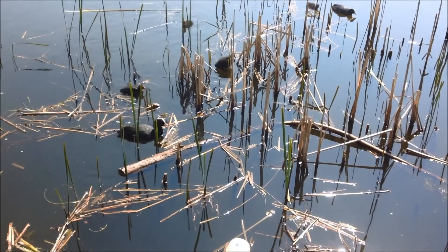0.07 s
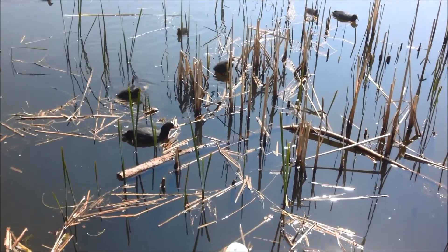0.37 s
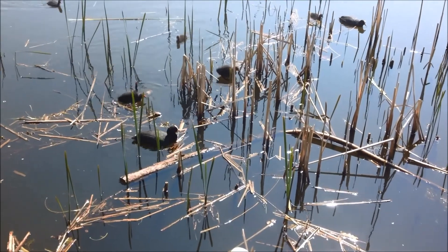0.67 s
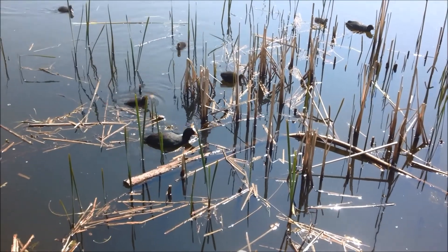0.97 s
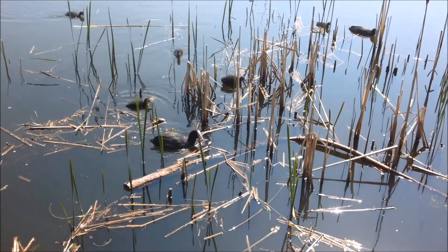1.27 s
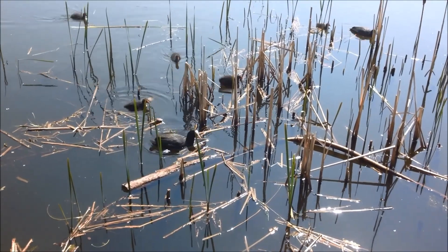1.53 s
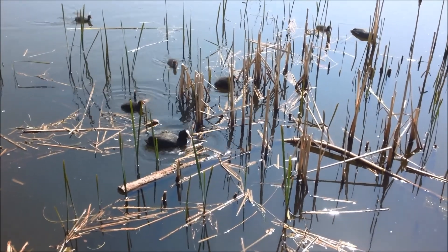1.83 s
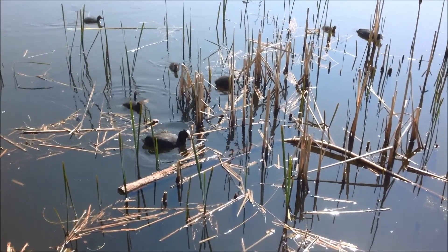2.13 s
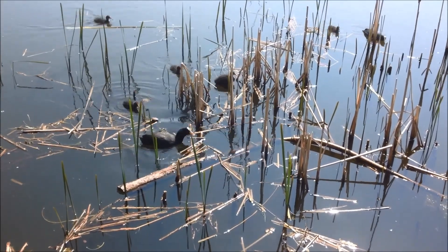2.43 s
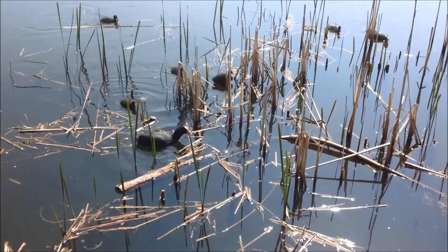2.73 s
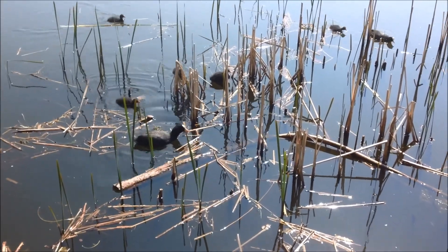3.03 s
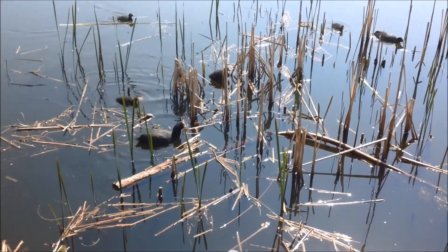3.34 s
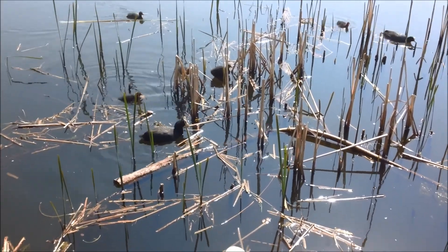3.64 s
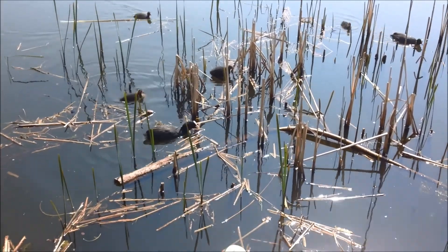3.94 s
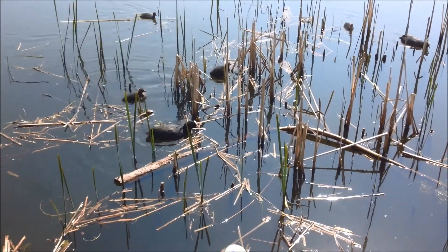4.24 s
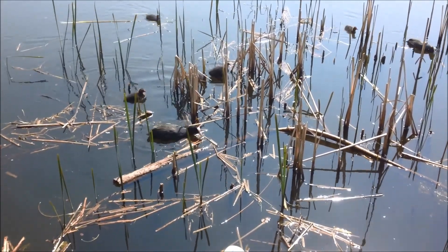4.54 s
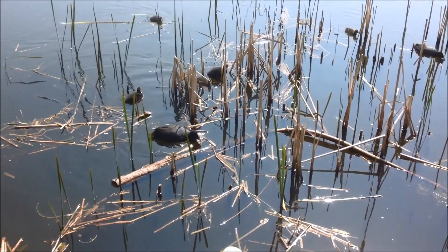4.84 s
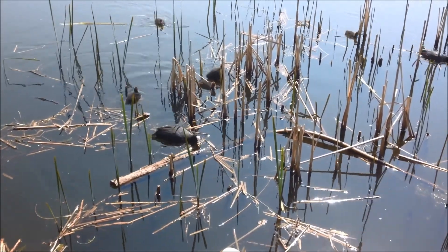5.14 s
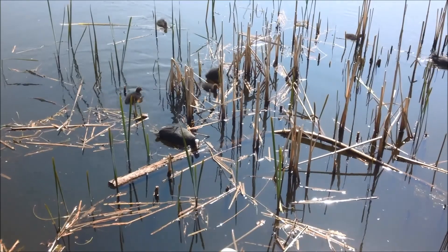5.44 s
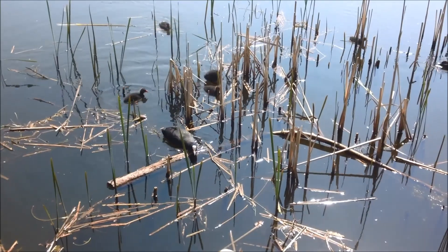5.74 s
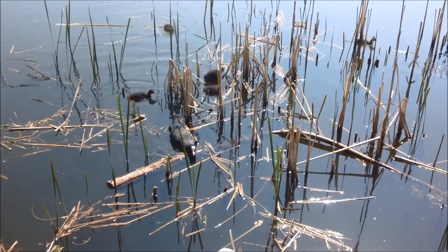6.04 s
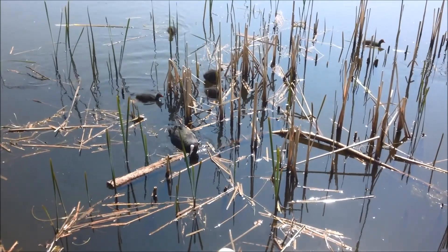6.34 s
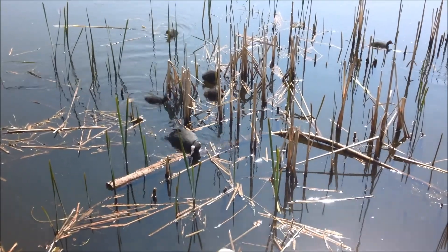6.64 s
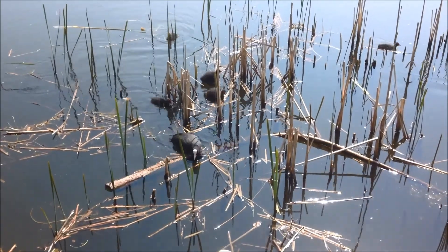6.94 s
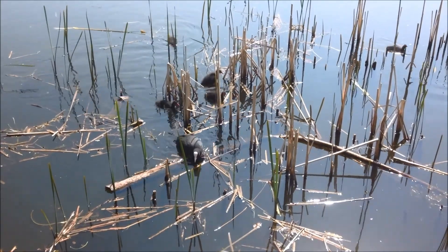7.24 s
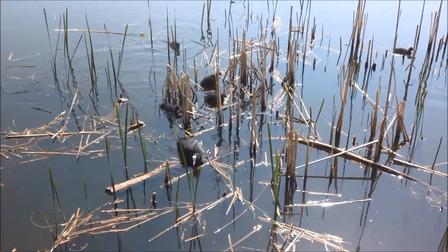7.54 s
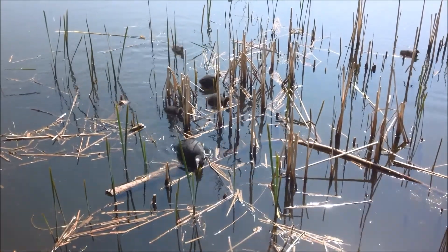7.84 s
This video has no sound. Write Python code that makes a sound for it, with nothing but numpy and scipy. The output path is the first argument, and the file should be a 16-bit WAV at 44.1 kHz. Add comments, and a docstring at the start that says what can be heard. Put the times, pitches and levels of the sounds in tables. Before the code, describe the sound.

A coot calls close to the microphone on a quiet canal, and is by far the loudest sound. It gives four short, harsh, stuttering honks at about 0.3, 1.1, 2.2 and 4 seconds, the first one softer. Three sharp, high, cracking squeaks come at 1.3, 2.5 and 4 seconds, the last running into the final honk. The banks return a faint echo. Farther off, chicks peep softly throughout, adding falling, begging whistles until about 5.3 seconds. Distant songbirds whistle and warble faintly, briefly around 3 seconds and more steadily from 5.5 seconds to the end near 8. Dry reeds rustle and tick lightly during the first five seconds. Gentle puffs of wind brush the microphone, and a camera's focus motor gives tiny, very high whines, mainly in the first second and around 5 seconds. A faint distant drone and airy hiss lie underneath.

```python
"""Coot and chicks on a canal

A coot gives four stuttering "kow" calls and three sharp "pix" notes with its syrinx, a bird's voice box.
Its chicks peep and beg in gliding whistles, and far birds warble. Dry reeds rub and snap, light wind
brushes the microphone, and a camera's focus motor whines now and then. A distant drone and an airy
hiss lie underneath, and the banks return a faint echo of the birds."""
import sys
import numpy as np
from scipy import signal
from scipy.fft import rfft, irfft, next_fast_len
from scipy.io import wavfile

SR = 44100
rng = np.random.default_rng(int(sys.argv[2]) if len(sys.argv) > 2 else 0)


def file_out(sig):
    """Save sig as 16-bit WAV at sys.argv[1]."""
    # one column per channel
    cols = np.atleast_2d(sig).T
    # limit, then scale
    lim = np.clip(cols, -1, 1)
    pcm = np.round(lim * 32767).astype(np.int16)
    wavfile.write(sys.argv[1], SR, pcm)


N = 348390
TIME = np.arange(N) / SR


def from_db(db):
    """Turn decibels into a number to multiply by."""
    return 10 ** (np.asarray(db) / 20)


def gain_at(colour, hz):
    """How strongly a table of (frequency [Hz], level [dB]) passes the given frequencies."""
    table_hz, db = np.transpose(colour)
    return from_db(np.interp(np.log(np.maximum(hz, 1)), np.log(table_hz), db))


def noise(colour):
    """Noise of average power 1; the colour table sets its mix of low and high frequencies."""
    size = next_fast_len(N)
    spectrum = rfft(rng.standard_normal(size)) * gain_at(colour, np.fft.rfftfreq(size, 1 / SR))
    sound = irfft(spectrum, size)[:N]
    return sound / np.sqrt(np.mean(sound ** 2) + 1e-20)


def drift(t, rate):
    """A random wobble that heads for a new value `rate` times a second."""
    return np.interp(t * rate, np.arange(1024), rng.standard_normal(1024))


def clock(length):
    """The time of each sample in one event, in seconds."""
    return np.arange(max(int(length * SR), 2)) / SR


def add(out, start, sound):
    """Mix a sound in at `start` seconds."""
    at = int(round(start * SR))
    sound, at = sound[max(-at, 0):], max(at, 0)
    out[at:at + len(sound)] += sound[:max(N - at, 0)]


def phase_of(hz):
    """The angle a vibration has turned through as its pitch changes."""
    return 2 * np.pi * np.cumsum(hz) / SR


def fade_ends(t, edge):
    """Fade in and out, each over `edge` seconds."""
    return np.sin(np.pi / 2 * np.clip(np.minimum(t, t[-1] - t) / edge, 0, 1))


def hump(t, centre, half):
    """A bell-shaped swell of height 1."""
    return np.exp(-np.minimum(((t - centre) / half) ** 2, 30))


def whistle(t, hz, harmonics_db=(0,), jitter=.009, flutter_db=4):
    """A nearly pure tone with unsteady pitch (jitter) and strength (flutter)."""
    phase = phase_of(hz * (1 + jitter * drift(t, 488)))
    flutter = from_db(flutter_db * drift(t, 158))
    return flutter * sum(from_db(db) * np.sin(k * phase) for k, db in enumerate(harmonics_db, 1))


# puffs of wind: (peak time [s], half length [s], level [dB])
WIND_PUFFS = [(0.084, 0.058, -54), (0.275, 0.086, -48.5), (0.445, 0.025, -48.5), (0.57, 0.091, -54),
              (0.817, 0.082, -46), (0.943, 0.037, -46.5), (1.07, 0.06, -55.5), (1.693, 0.055, -45.5),
              (1.801, 0.013, -50.5), (1.942, 0.029, -41.5), (3.084, 0.038, -46.5), (3.183, 0.029, -42),
              (3.292, 0.05, -43.5), (3.45, 0.2, -57.5), (4.08, 0.11, -59), (5.257, 0.021, -52),
              (7.258, 0.013, -41), (7.43, 0.034, -48), (7.66, 0.14, -59), (7.763, 0.012, -48.5),
              (7.865, 0.021, -42.5)]
# the wind's low rumble: (frequency [Hz], level [dB])
WIND_COLOUR = [(20, -25), (50, -20.5), (90, -3.5), (150, 2.5), (210, -2), (300, -11), (500, -23.5),
               (1200, -74)]
def wind(breeze_db=-64.5, swing_db=1.5, swings_per_s=13):
    """Light air brushes the microphone, with stronger puffs now and then."""
    breeze = from_db(breeze_db + swing_db * drift(TIME, swings_per_s))
    puffs = sum(from_db(db) * hump(TIME, peak, half) for peak, half, db in WIND_PUFFS)
    return np.hypot(breeze, puffs) * noise(WIND_COLOUR)


# how the drone and the hiss rise and fall: (time [s], level [dB])
DRONE_LEVELS = [(0.0, -67.5), (0.72, -57), (1.65, -53.5), (2.11, -60.5), (2.86, -63), (3.19, -60.5),
                (4.82, -60.5), (5.19, -57), (6.07, -56), (6.18, -59.5), (7.0, -59.5), (7.26, -58.5),
                (7.9, -60)]
HISS_LEVELS = [(0.0, -56.5), (0.55, -56.5), (1.12, -54), (1.32, -50.5), (1.52, -66.5), (1.67, -61.5),
               (1.96, -59.5), (2.62, -60.5), (3.37, -54.5), (3.63, -60), (5.76, -59), (6.2, -61),
               (6.53, -57.5), (7.0, -60.5), (7.41, -59), (7.9, -58)]
# the tone of the drone, the hiss and the still air: (frequency [Hz], level [dB])
DRONE_COLOUR = [(60, -38), (180, -6.5), (255, 1.5), (288, 6.5), (325, -1), (400, -1.5), (600, -17),
                (1000, -33.5)]
HISS_COLOUR = [(1200, 1.5), (2000, 1), (2800, 5), (4300, 0.5), (5500, -3.5), (8000, -9), (10000, -21),
               (13000, -20), (15500, -13.5)]
AIR_COLOUR, AIR_DB = [(100, -5.5), (500, 2.5), (800, 2.5), (1200, -2.5), (1800, -7), (3000, -9.5),
                      (6000, -61)], -62
def background(hiss_gain_db=-3.5):
    """A distant drone and an airy hiss slowly swell and sink over a steady hush."""
    drone = from_db(np.interp(TIME, *np.transpose(DRONE_LEVELS))) * noise(DRONE_COLOUR)
    hiss = from_db(np.interp(TIME, *np.transpose(HISS_LEVELS)) + hiss_gain_db) * noise(HISS_COLOUR)
    return drone + hiss + from_db(AIR_DB) * noise(AIR_COLOUR)


# the chicks' begging whistles: (time [s], held pitch [Hz], length [s], level [dB])
BEGGING_WHISTLES = [(.007, 2900, 0.118, -52.5), (0.338, 2690, 0.16, -56), (0.696, 3750, 0.13, -55),
                    (1.076, 4400, 0.07, -45), (1.434, 4400, 0.072, -50), (1.775, 3300, 0.095, -55),
                    (2.491, 2850, 0.12, -52), (2.889, 4280, 0.093, -54.5), (3.209, 3100, 0.15, -57),
                    (3.582, 4350, 0.072, -54), (4.298, 4370, 0.078, -55), (4.618, 3850, 0.082, -51.5),
                    (4.946, 3810, 0.055, -60), (5.01, 3750, 0.096, -55.5), (5.234, 4140, 0.078, -55)]
def chick_begging(start_hz=6900, gain_db=-0.5, fade_db=-1.0):
    """Each whistle drops from high up, then holds its pitch."""
    out = np.zeros(N)
    for start, held_hz, length, db in BEGGING_WHISTLES:
        t = clock(length)
        drop_s = 0.019 * (4000 / held_hz) ** 2.9   # a deeper drop takes longer
        hz = held_hz + (start_hz - held_hz) * np.exp(-(t / drop_s) ** 2)
        loudness = from_db(db + gain_db + fade_db * t / length) * fade_ends(t, 0.0045)
        add(out, start, loudness * whistle(t, hz, harmonics_db=(0, -24)))
    return out


def chick_chatter(peeps_per_s=3.0, pitch_range_hz=(3290, 5200)):
    """Extra soft peeps at random moments, as rows like those of PEEPS."""
    draws = rng.random((int(peeps_per_s * N / SR), 4))
    return [(when * N / SR, np.interp(high, (0, 1), pitch_range_hz), .018 + .012 * long, -73 + 6 * loud)
            for when, high, long, loud in draws]


# the chicks' peeps: (peak time [s], top pitch [Hz], half length [s], level [dB])
PEEPS = [(0.088, 3670, 0.025, -60), (0.155, 5400, 0.036, -60), (0.238, 3440, 0.025, -58),
         (0.814, 5850, 0.036, -58.5), (1.706, 6600, 0.028, -63), (1.908, 5730, 0.038, -56.5),
         (2.061, 6040, 0.026, -50), (2.637, 3820, 0.023, -58), (2.808, 6720, 0.023, -60.5),
         (2.91, 5650, 0.041, -57.5), (3.075, 6100, 0.033, -55), (3.258, 5500, 0.028, -52),
         (3.427, 5930, 0.033, -50.5), (3.652, 6800, 0.025, -62), (3.946, 7050, 0.04, -57),
         (4.088, 5210, 0.049, -60), (4.463, 5900, 0.041, -59.5), (4.63, 6270, 0.032, -53.5),
         (4.745, 3650, 0.023, -60.5), (5.014, 5900, 0.043, -56), (5.187, 6040, 0.032, -61.5),
         (5.282, 5660, 0.041, -57), (5.443, 4170, 0.026, -58.5), (5.595, 3800, 0.018, -58),
         (5.669, 5850, 0.041, -59.5), (5.757, 3840, 0.02, -58), (5.842, 5600, 0.034, -63),
         (5.909, 5880, 0.032, -66), (5.968, 3830, 0.021, -61.5), (6.04, 6200, 0.023, -63.5),
         (6.2, 6430, 0.037, -58.5), (6.331, 5800, 0.033, -61), (6.58, 5200, 0.025, -60.5),
         (6.613, 3880, 0.023, -60.5), (6.704, 6870, 0.041, -59), (6.984, 6580, 0.033, -56.5),
         (7.124, 4770, 0.021, -62.5), (7.255, 5920, 0.025, -59), (7.383, 5880, 0.044, -57),
         (7.484, 3830, 0.022, -58.5), (7.62, 6080, 0.036, -57.5)]
def chick_peeps(rest_hz=2540, gain_db=4.5, fade_db=-0.5, lean=0.25, hoarse_after_s=0.026):
    """Each peep climbs from a low resting pitch to its top and sinks back, in a slightly leaning arch."""
    out = np.zeros(N)
    for peak, top_hz, half, db in list(PEEPS) + chick_chatter():
        t = clock(4 * half)
        from_top = t / half - 2
        tilt = 1 + lean * rng.uniform(-0.98, 1) * np.tanh(from_top)
        tension = np.exp(-from_top ** 2 * tilt)
        hz = (rest_hz + (top_hz - rest_hz) * tension) * (1 + .016 * drift(t, 71))
        # strained toward the top, a long peep breaks into a hoarse, slightly higher hiss
        broken = np.clip(36 * (half - hoarse_after_s), .1, .85) * tension ** 2
        hoarse_hz = hz * (1 + .13 * (.5 + drift(t, 4000)))
        hoarse = from_db(-1) * whistle(t, hoarse_hz, harmonics_db=(0, -18))
        clear = whistle(t, hz, harmonics_db=(0, -18, -26))
        loudness = from_db(db + gain_db + fade_db * from_top) * np.exp(-(from_top / 1.45) ** 6)
        add(out, peak - 2 * half, loudness * ((1 - broken) * clear + broken * hoarse))
    return out


# notes of far birds: (time [s], length [s], start pitch [Hz], end pitch [Hz], level [dB])
FAR_NOTES = [(0.118, 0.17, 2093, 2003, -60.5), (0.851, 0.14, 2280, 2125, -57),
             (1.951, 0.055, 1950, 2340, -58), (1.997, 0.062, 2350, 2270, -52),
             (3.174, 0.05, 2150, 2430, -54)]
def far_whistles():
    """Birds across the water give soft, low, sliding whistles."""
    out = np.zeros(N)
    for start, length, start_hz, end_hz, db in FAR_NOTES:
        t = clock(length)
        tone = whistle(t, np.linspace(start_hz, end_hz, len(t)), jitter=.018, flutter_db=3)
        add(out, start, from_db(db) * fade_ends(t, 0.0056) * tone)
    return out


# reeds brushing together: (peak time [s], half length [s], level [dB])
RUSTLES = [(0.9, 0.059, -60.5), (1.583, 0.016, -58.5), (1.784, 0.049, -55.5), (2.964, 0.074, -64.5),
           (3.3, 0.065, -62), (3.643, 0.1, -65.5), (3.906, 0.084, -60.5), (4.431, 0.042, -57),
           (4.888, 0.1, -62.5)]
# stems snapping: (time [s], level [dB])
SNAPS = [(0.164, -44.5), (0.28, -49), (0.594, -45), (0.952, -37), (.960, -42), (1.785, -45), (3.287, -48),
         (4.5613, -40.5), (4.906, -47)]
# the crisp tone of dry reeds: (frequency [Hz], level [dB])
REED_COLOUR = [(1500, -1.5), (3000, 0.5), (5000, 3), (7500, 2), (9500, -8), (12000, -8.5), (15500, -13)]
def reeds(grain_db=5.0, snap_decay_s=0.0012):
    """Dry leaves rub in grainy swells, and a stem ticks now and then."""
    swells = sum(from_db(db) * hump(TIME, peak, half) for peak, half, db in RUSTLES)
    grain_times = TIME[::64]
    grain = np.interp(TIME, grain_times, rng.standard_normal(len(grain_times)))
    loudness = swells * from_db(grain_db * grain)
    for start, db in SNAPS:
        add(loudness, start, from_db(db) * np.exp(-clock(.02) / snap_decay_s))
    return loudness * noise(REED_COLOUR)


# runs of the focus motor: (time [s], length [s], level [dB])
FOCUS_RUNS = [(0.205, 0.036, -55.5), (.333, 0.014, -47.5), (.409, 0.015, -46), (.624, 0.015, -45),
              (3.276, .035, -67), (4.29, .02, -67), (4.965, 0.056, -54), (5.033, 0.069, -59),
              (5.367, 0.06, -69), (5.433, 0.032, -64.5), (6.06, 0.14, -67.5), (6.943, .03, -66),
              (7.563, 0.05, -61)]
# the tones the lens barrel rings at: (frequency [Hz], level [dB])
LENS_TONES = [(10330, 2.5), (11790, 0), (15100, -14)]
def focus_motor(rise_s=0.00061, ring_s=.012):
    """The motor sets the lens barrel whining; from halfway through each run the whine dies away."""
    out = np.zeros(N)
    for start, length, db in FOCUS_RUNS:
        t = clock(length + .06)
        loudness = np.minimum(t / rise_s, 1) * np.exp(-np.maximum(t - length / 2, 0) / ring_s)
        whine = sum(from_db(tone_db) * whistle(t, hz, jitter=.004, flutter_db=2.5)
                    for hz, tone_db in LENS_TONES)
        add(out, start, from_db(db) * loudness * whine)
    return out


# the coot's "kow" calls: (time [s], length [s], stutter beat [s], burst overlap [s], top pitch [Hz],
# pitch sag [Hz/s], level [dB], extra brightness of the second burst [dB])
KOW_CALLS = [(0.341, 0.055, 0.017, 0.002, 783.5, 1380, -28, -3),
             (1.0881, 0.088, 0.0092, 0.0001, 872, 1756, -19.5, 12.5),
             (2.163, 0.087, 0.0118, 0.0008, 842.5, 2040, -20.5, 4.5),
             (3.977, 0.0815, 0.012, 0.00087, 863, 2342, -20.5, 5)]
def kow_bursts(slowing=1.35, fade_db=18.5, first_db=-4.5, first_flat_hz=35.6, strain_hz_per_db=3.5):
    """Split each call into a stutter that slows after three beats and sinks after the second."""
    for start, length, beat, overlap, top_hz, sag_hz_per_s, db, bright_db in KOW_CALLS:
        at, k = 0, 0
        while at < length:
            span = beat * slowing ** max(k - 2, 0)
            last = at + 1.7 * span > length
            span = length - at if last else span
            since_top = at + span / 2 - 1.5 * beat
            strain_db = bright_db * np.exp(-abs(k - 1) / 0.87)   # strain brightens and lifts the voice
            sag_hz = sag_hz_per_s * since_top if k else first_flat_hz
            pitch_hz = top_hz + strain_hz_per_db * strain_db - sag_hz
            level_db = db + (-fade_db * (abs(since_top) / length) ** 1.5 if k else first_db)
            yield start + at, span, overlap, pitch_hz, level_db, strain_db
            at, k = length if last else at + span, k + 1


# how the throat shapes the high harmonics (multiples of the pitch): (frequency [Hz], level [dB])
THROAT_COLOUR = [(2100, 5), (2600, -3.5), (3400, -8), (4000, -12.5), (4700, -13.5), (5500, -32),
                 (6400, -20.5), (7600, -30.5), (9500, -49), (15000, -57)]
# the rasp of air in the calls: (frequency [Hz], level [dB])
RASP_COLOUR = [(600, -12), (1200, -2.5), (2700, 2.5), (4400, -4.5), (5500, -15.5), (7500, -16.5),
               (9500, -23.5), (12000, -41), (15000, -23)]
def coot_kows(fall_hz=71, sag_db=-5.5, upper_db=-5.5, shimmer_db=3.0, rasp_db=-9.5, floor_hz=690):
    """The syrinx sounds in bursts that break off and restart, each sagging in pitch and strength."""
    out, breath = np.zeros(N), noise(RASP_COLOUR)
    for start, length, overlap, pitch_hz, db, strain_db in kow_bursts():
        t = clock(length + 2 * overlap)
        from_middle = t / length - .5
        harsh = np.clip(from_db(db + 23), .3, 1)
        hz = (pitch_hz - fall_hz * np.sqrt(harsh) * from_middle) * (1 + .009 * drift(t, 920))
        phase = phase_of(hz)
        lower = from_db(-0.5) * np.sin(phase) + from_db(3) * harsh ** 0.18 * np.sin(2 * phase)
        upper = 0
        for k in range(3, 18):
            strength = gain_at(THROAT_COLOUR, k * hz) * from_db(shimmer_db * drift(t, 236))
            throat_lag = .6 * (k - 2) ** 1.5
            blur = np.minimum(harsh * .028 * k * k, 2) * drift(t, 700)   # no two harsh cycles are alike
            upper += strength * np.sin(k * phase - throat_lag + blur)
        air_puffs = breath[int(start * SR):][:len(t)] * (1 + np.sin(phase))   # air escapes once a cycle
        rasp = np.sqrt(harsh) * from_db(rasp_db) * air_puffs
        voice = lower + from_db(upper_db + strain_db) * (upper + rasp)
        add(out, start - overlap, from_db(db + sag_db * from_middle) * fade_ends(t, 0.0053) * voice)
    # the short throat gives off almost nothing below the call's pitch
    return signal.sosfilt(signal.butter(6, floor_hz, "high", fs=SR, output="sos"), out)


def resonate(sound, tones):
    """Let a sound set several tones ringing; the narrower a tone, the longer it rings."""
    out = 0
    for k, (hz, width_hz, db) in enumerate(tones):
        decay, angle = np.exp(-np.pi * width_hz / SR), 2 * np.pi * hz / SR
        ring = signal.lfilter([.5, 0, -.5], [1, -2 * decay * np.cos(angle), decay ** 2], sound)
        out = out + (-1) ** k * from_db(db) * ring
    return out


# the coot's "pix" notes: (time [s], crack level [dB], whistle pitch [Hz], first push [dB],
# second push delay [s], second push [dB], second harmonic compared with the first [dB])
PIX_NOTES = [(1.3120, -13, 4290, -19.5, 0.017, -19, -24), (2.4633, -15.5, 4510, -20.5, 0.016, -18.5, -12.5),
             (3.9554, -15.5, 4410, -30.5, 0.0154, -27.5, -0.5)]
# the tones its body and beak ring at: (frequency [Hz], width [Hz], level [dB])
BODY_TONES = [(326, 143, 7), (630, 350, 4.5), (1350, 360, 6.5), (2290, 710, 6.5)]
BEAK_TONES = [(4810, 590, 5.5), (5550, 550, 0.5), (6250, 220, -2), (7100, 880, -2), (8300, 1100, -3),
              (10600, 670, -18), (14000, 2500, -21)]
def coot_pixes(pulse_hz=758.3, decay_s=0.0053, body_db=-29, spit_db=-24, hiss_db=-26, rise_hz=265):
    """A few hard pulses crack the note open; the syrinx jumps to a high whistle that swells twice."""
    out, t = np.zeros(N), clock(.035)
    beats = np.arange(12) / pulse_hz
    for start, crack_db, whistle_hz, first_db, again_s, again_db, harmonic_db in PIX_NOTES:
        pulses = np.zeros(len(t))
        pulse_times = np.abs(beats + .00003 * rng.standard_normal(len(beats)))
        uneven = from_db(1.5 * rng.standard_normal(len(beats)))
        pulses[(pulse_times * SR).astype(int)] = np.exp(-(beats / decay_s) ** 2) * uneven
        spit = from_db(spit_db) * rng.standard_normal(len(t)) * np.exp(-t / (2 * decay_s))
        add(out, start, from_db(body_db) * resonate(pulses, BODY_TONES))
        add(out, start + 1 / pulse_hz, from_db(crack_db) * resonate(pulses + spit, BEAK_TONES) / 2)
        first, again = hump(t, 0.0051, half=0.0044), hump(t, again_s, half=0.0048)
        phase = phase_of((whistle_hz + rise_hz * again) * (1 + .018 * drift(t, 3000)))
        tone = np.sin(phase) + from_db(harmonic_db) * np.sin(2 * phase) + from_db(-30) * np.sin(3 * phase)
        air = from_db(hiss_db) * rng.standard_normal(len(t))
        pushes = from_db(first_db) * first + from_db(again_db) * again
        add(out, start, pushes * fade_ends(t, 0.0018) * (tone + air))
    return out


# phrases of far reed songbirds: (time [s], length [s], pitch [Hz], pitch spread [Hz], level [dB])
FAR_WARBLES = [(2.599, 0.28, 1950, 150, -61.5), (3.053, 0.58, 2924, 270, -56.5),
               (5.5, 0.36, 2996, 280, -55), (5.95, 0.18, 2630, 120, -58.5), (6.248, .47, 3100, 160, -54),
               (6.326, 0.78, 7850, 170, -70), (6.734, 0.21, 4040, 128, -62), (6.842, 0.18, 2716, 102, -55),
               (7.016, 0.35, 5330, 200, -64), (7.384, 0.59, 4760, 380, -60)]
def far_warbles(notes_per_s=20, step_hz=129.6, accent_db=1.5):
    """Songbirds sing fast, blurred runs that shift in pitch and strength from note to note."""
    out = np.zeros(N)
    for start, length, hz, spread_hz, db in FAR_WARBLES:
        t = clock(length)
        tune = hz + step_hz * drift(t, notes_per_s) + spread_hz * drift(t, 500)
        tone = whistle(t, tune, jitter=.025, flutter_db=3)
        pace = notes_per_s * (1 + .3 * drift(t, 10))
        notes = np.abs(np.sin(phase_of(pace) / 2))
        loudness = from_db(db + accent_db * drift(t, notes_per_s)) * fade_ends(t, 0.048)
        add(out, start, loudness * notes * tone)
    return out


def among_reeds(voices, scatter_db=-4, decay_s=.007):
    """Stems and water scatter a far voice within milliseconds, so a glide comes out ragged."""
    t = clock(.04)
    scatter = rng.standard_normal(len(t)) * np.exp(-t / decay_s)
    scatter /= np.linalg.norm(scatter)
    return voices + from_db(scatter_db) * signal.fftconvolve(voices, scatter)[:N]


# echoes from the banks: (delay [s], level [dB])
BANK_ECHOES = [(0.011, -20.5), (.058, -27.5), (.135, -36.5), (.29, -38.5)]
# the tone of the echo: (frequency [Hz], level [dB])
ECHO_COLOUR = [(200, -6), (800, -0.5), (1700, 1), (3000, 0), (4500, 0), (7000, 1.5), (9200, 0),
               (12000, -2.5)]
def canal_echo(voices, tail_db=-22, tail_s=0.49, near_db=-23, near_s=0.26):
    """Sound comes back as scatter from near reeds, a thin long tail and smeared echoes off the banks."""
    t = clock(1.2)
    power = 0
    for db, fade_s in (tail_db, tail_s), (near_db, near_s):
        shape = from_db(-60 * t / fade_s) * np.minimum(t / 0.0029, 1)
        power += from_db(db) ** 2 * shape ** 2 / np.sum(shape ** 2)
    for delay, db in BANK_ECHOES:
        shape = np.exp(-np.abs(t - delay) / (0.18 * delay))
        power += from_db(db) ** 2 * shape / np.sum(shape)
    return signal.fftconvolve(voices, np.sqrt(power) * noise(ECHO_COLOUR)[:len(t)])[:N]


def scene(others_db=-1.46, extra_echo_db=4.5):
    """The coot is close; the other birds are farther off, so they carry more echo."""
    coot = coot_kows() + coot_pixes()
    others = chick_begging() + chick_peeps() + far_whistles() + far_warbles()
    others = from_db(others_db) * among_reeds(others)
    echo = canal_echo(coot + from_db(extra_echo_db) * others)
    return (coot + others + echo + reeds() + focus_motor() + wind() + background())[None]


def record(dry, low_cut_hz=60, high_cut_hz=15600):
    """The small microphone loses the deep bass; the highest treble is cut steeply."""
    thin = signal.sosfilt(signal.butter(2, low_cut_hz, "high", fs=SR, output="sos"), dry)
    return signal.sosfilt(signal.ellip(10, .2, 70, high_cut_hz, fs=SR, output="sos"), thin)


dry = scene()
out = record(dry)
file_out(out)
```